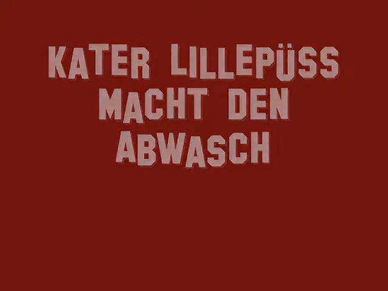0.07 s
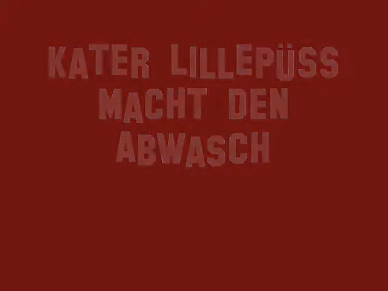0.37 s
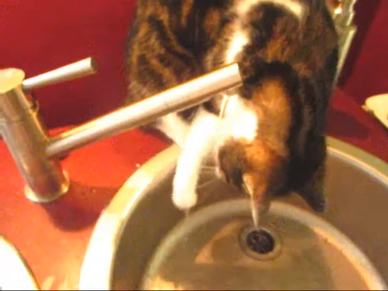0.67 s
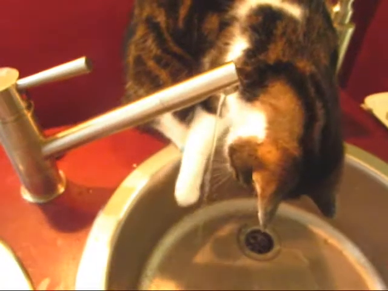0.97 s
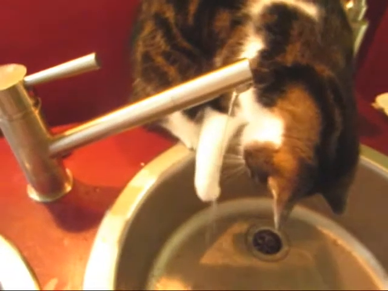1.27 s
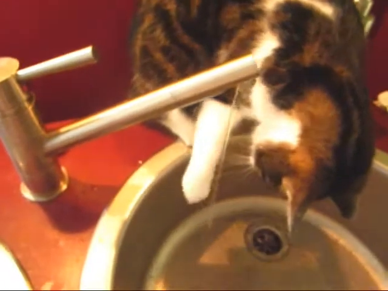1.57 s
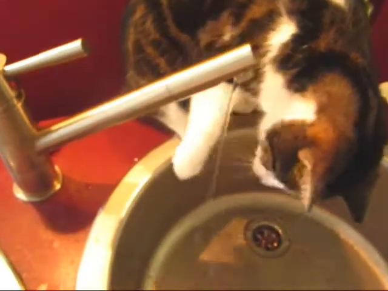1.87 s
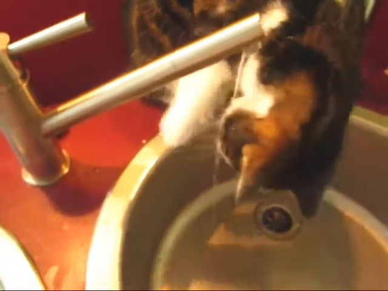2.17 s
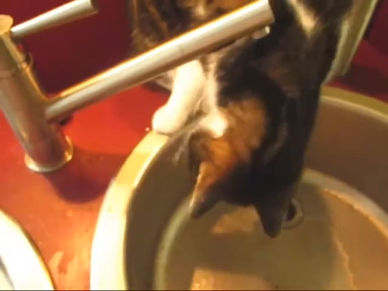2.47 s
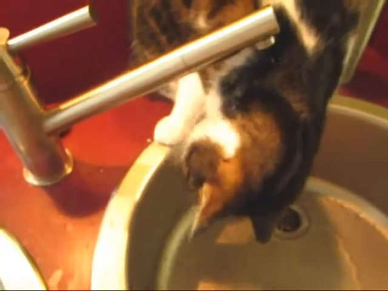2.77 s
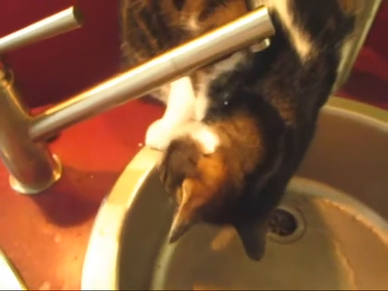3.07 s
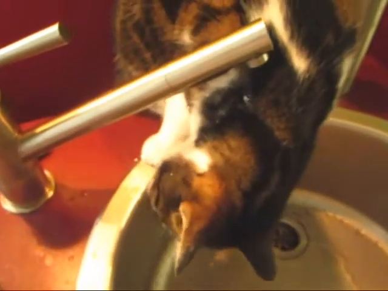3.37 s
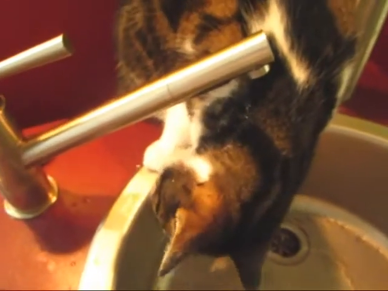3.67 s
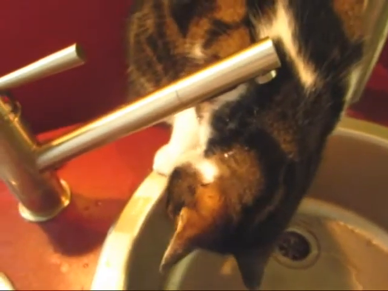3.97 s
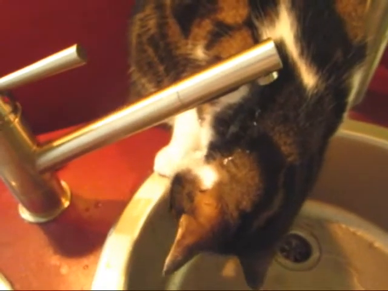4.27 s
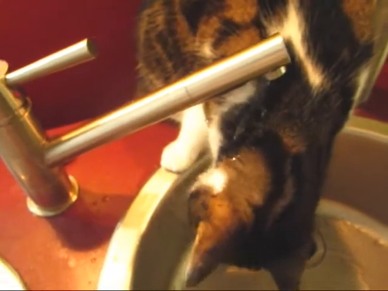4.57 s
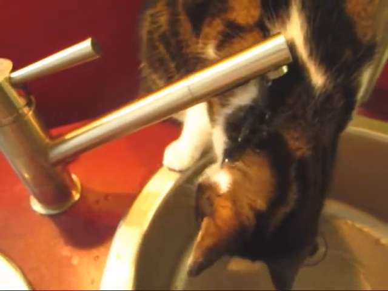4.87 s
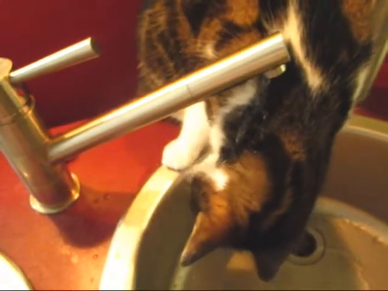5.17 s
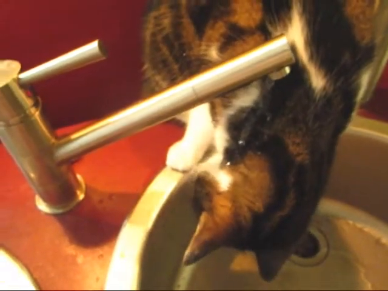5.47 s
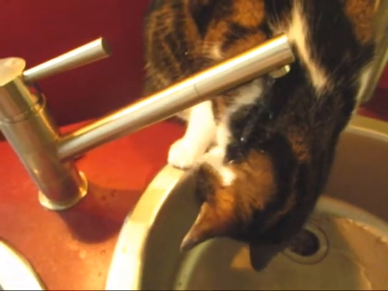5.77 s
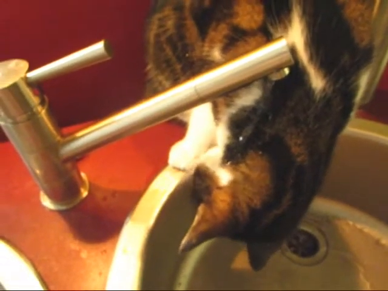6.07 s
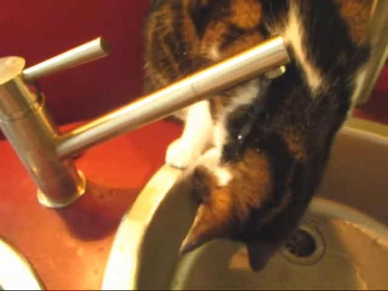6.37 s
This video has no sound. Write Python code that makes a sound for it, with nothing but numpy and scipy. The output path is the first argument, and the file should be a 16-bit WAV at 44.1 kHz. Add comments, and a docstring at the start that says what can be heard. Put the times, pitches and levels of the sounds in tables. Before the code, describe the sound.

Close to a steel kitchen sink, a thin stream of tap water patters and drums unevenly while a cat paws at it, flinging bigger drops that slap and plink. The drumming stops as the cat puts its head under the stream, leaving soft swishes of wet fur and a few faint plinks. Something clacks across the room, a distant machine hums briefly, and a small dry bump ends it, over faint hiss.

```python
"""Cat at the kitchen tap

A thin stream of tap water beads into drops that drum on a steel sink; a cat paws at it and flings
bigger drops. Then it puts its head under the stream: the drumming stops, leaving soft swishes of wet
fur and a few plinks. Something clacks in the room, a distant machine hums up and runs down, and a dry
bump comes at the end, all over a faint hiss and a thin electronic whine."""
import sys
import numpy as np
from scipy import signal
from scipy.fft import rfft, irfft, next_fast_len
from scipy.io import wavfile
from scipy.ndimage import uniform_filter1d, map_coordinates

SR = 44100
rng = np.random.default_rng(int(sys.argv[2]) if len(sys.argv) > 2 else 0)


def transcribe(signal):
    """Save signal, clipped to [-1, 1], as a 16-bit WAV file at the path in sys.argv[1]."""
    frames = np.atleast_2d(signal).T
    limited = np.clip(frames, -1, 1)
    pcm = np.round(limited * 32767).astype(np.int16)
    wavfile.write(sys.argv[1], SR, pcm)


N = 291501
TIME = np.arange(N) / SR
AGE = TIME[:SR // 2]  # seconds since a hit
START_S, TOP_HZ = 0.665, 15450  # the sound's entry; its treble limit
# EQ of water splatting on steel: f/Hz, level/dB
SPATTER_EQ = [(100, -60), (300, -19), (600, 3.5), (1300, 2.5), (1700, -0.5), (2400, 3.5), (3600, -5),
              (6000, -9), (9500, -8.5), (10400, -9), (11300, -8.5), (12000, -12), (12800, -8),
              (15000, -10.5)]


def amp(db):
    """Decibels to gain."""
    return 10 ** (np.asarray(db) / 20)


def unit(x):
    """Scale to rms 1."""
    return x / np.sqrt(np.mean(x ** 2) + 1e-20)


def unit_attack(x):
    """Scale a hit to rms 1 over its first 10 ms."""
    return x / np.sqrt(np.mean(x[:SR // 100] ** 2) + 1e-20)


def along(points, hz):
    """Read (f/Hz, value) points on a log frequency axis."""
    freqs, values = np.transpose(points)
    return np.interp(np.log(hz + 1), np.log(freqs), values)


def fade(t60):
    """A decay of 60 dB in t60 seconds."""
    return np.exp(-np.log(1000) * AGE / t60)


def add(track, s, sound):
    """Mix a sound into the track at s seconds."""
    part = track[round(s * SR):][:len(sound)]
    part += sound[:len(part)]


def colour(x, eq):
    """Minimum-phase EQ with a power gain of 1."""
    size = 2 * next_fast_len(len(x))
    gain = unit(amp(along(eq, np.fft.rfftfreq(size, 1 / SR))))
    cepstrum = irfft(np.log(gain + 1e-6))
    cepstrum[1:size // 2] *= 2
    cepstrum[size // 2 + 1:] = 0
    return irfft(rfft(x, size) * np.exp(rfft(cepstrum)), size)[:len(x)]


def stream(drops_per_s=85, size_spread_db=2, drum_db=-1.43, spray=0.35):
    """The stream beads into uneven drops; each drums the steel and spatters, both following the flow."""
    # water that gets past the paw to the basin floor: t/s, level/dB
    flow = [(0.67, -36), (0.708, -34), (0.768, -47.5), (0.906, -31), (1.022, -41), (1.03, -33.5),
            (1.22, -33), (1.26, -39.5), (1.344, -31), (1.432, -32.5), (1.482, -25.5), (1.582, -31.5),
            (1.592, -41), (1.754, -37), (1.774, -31), (1.83, -40.5), (2.212, -32.5), (2.45, -48)]
    times, levels = np.transpose(flow)
    flow_db = np.interp(TIME, times, levels)
    usual_db = levels.mean()
    spatter_db = usual_db - 14 + 0.97 * (flow_db - usual_db)  # rides under the drumming
    drum, splats = np.zeros(N), np.zeros(N)
    slots = np.arange(START_S, times[-1], 1 / drops_per_s)
    for s in slots + rng.uniform(0, 1 / drops_per_s, len(slots)):
        size = amp(size_spread_db * np.clip(rng.standard_normal(), -2, 1.5))
        add(drum, s, size * steel(scatter_db=2, contact_hz=2500))
        add(splats, s, size * fade(0.031) * rng.standard_normal(len(AGE)))
    running = (TIME > START_S) & (TIME < times[-1])
    mist = spray * running * rng.standard_normal(N)
    spatter = colour(splats / splats[running].std() + mist, SPATTER_EQ)
    return amp(flow_db + drum_db) * drum / drum[running].std() + amp(spatter_db) * spatter


def steel(scatter_db, contact_hz, attack_s=0.0022):
    """The basin rings: each impact point weights the modes anew; soft contact favours the low ones."""
    # modes of the steel basin: f/Hz, bandwidth/Hz, level/dB
    modes = [(141.2, 9.7, -10.5), (211.3, 7.8, -5), (293, 13, 2.5), (338.5, 8.8, -4), (384.7, 12.5, 1.5),
             (484, 22, -9), (508, 39, -5), (543.3, 13, -8), (670, 40, -1), (742, 24, -3), (792, 20, -5),
             (995, 26, -13), (1166, 23, -13.5), (1317, 59, -9)]
    hz, width, db = np.transpose(modes)[:, :, None]
    reach = 1 / (1 + (hz / contact_hz) ** 5)
    strength = amp(db + scatter_db * rng.standard_normal(hz.shape))
    weight = reach * strength * np.sqrt(width) * rng.choice([-1, 1], hz.shape)
    t = AGE[:SR // 3]
    ring = np.sum(weight * np.exp(-np.pi * width * t) * np.sin(2 * np.pi * hz * t), axis=0)
    return (1 - np.exp(-t / attack_s)) * ring * np.sqrt(2) / np.linalg.norm(weight)


def bowl(x, echo, span_s, tail):
    """The direct sound, a short volley of reflections across the bowl, then a weak tail."""
    walls = rng.standard_normal(len(AGE)) * (np.exp(-(AGE / span_s) ** 4) + tail * fade(0.2))
    walls *= echo / np.linalg.norm(walls)
    walls[0] += 1
    return signal.fftconvolve(x, walls)[:len(x)]


def heavy_drops(splat_trim_db=-8, drum_trim_db=-3):
    """Heavy drops slap the steel and set it ringing."""
    # single flung drops: t/s, splat level/dB, drum level/dB
    landings = [(.668, -35, -38), (0.7391, -25.5, -50), (0.889, -18, -50), (0.947, -30, -29.5),
                (1.145, -35, -30), (1.183, -36, -28.5), (1.345, -33, -26), (1.401, -29.5, -36),
                (1.4608, -19.5, -24), (1.481, -23.5, -19), (1.515, -24, -24), (1.767, -32.5, -26.5),
                (1.932, -27, -31), (1.975, -32.5, -27.5), (2, -34, -33), (2.026, -29.5, -30),
                (2.061, -30, -29), (2.095, -32, -39), (2.143, -29.5, -33), (2.247, -33, -28)]
    out = np.zeros(N)
    for s, splat_db, drum_db in landings:
        slap = bowl(fade(0.00019), echo=3.2, span_s=0.0097, tail=0.21)
        add(out, s, amp(splat_db + splat_trim_db) * unit_attack(colour(slap, SPATTER_EQ)))
        add(out, s, amp(drum_db + drum_trim_db) * steel(scatter_db=0, contact_hz=1210))
    return out


def plinks(trim_db=-10, overtone_db=-15, tilt_db_per_octave=-5.5):
    """A drop's sharp tick, two quickly damped rings and a faint overtone, drawn out by the bowl."""
    # plinking drops: t/s, level/dB, lower ring f/Hz, upper ring f/Hz, relative tick level/dB
    landings = [(0.6941, -25.5, 4300, 7700, -20), (0.961, -20, 4500, 7460, -22),
                (1.582, -21.5, 4340, 7700, 2), (1.8255, -29.5, 2970, 9150, -14),
                (1.877, -35.5, 5770, 6150, -1), (1.991, -33, 4160, 6900, 2), (2.003, -27, 3770, 8200, -6),
                (2.247, -34.5, 3100, 9000, -14), (2.3458, -19.5, 2780, 4300, -9),
                (2.349, -29, 9100, 14800, -4), (2.63, -34, 4060, 8000, -14),
                (4.562, -31.5, 2400, 9400, -20), (4.576, -32.5, 1800, 2940, -5),
                (4.996, -36, 1540, 1900, -18), (5.06, -41, 5000, 7000, -16), (6.295, -38, 5200, 6500, -16)]
    # EQ of the impact tick: f/Hz, level/dB
    tick_eq = [(500, -17), (2500, -9.5), (4500, -7), (5700, 8), (7000, -1.5), (9000, -13), (11500, -12),
               (15000, -9)]
    out = np.zeros(N)
    for s, db, low_hz, high_hz, tick_db in landings:
        high_db = tilt_db_per_octave * np.log2(high_hz / low_hz)
        overtone_hz = min(2.68 * low_hz, TOP_HZ)
        rings = 0
        for hz, ring_db in (low_hz, 0), (high_hz, high_db), (overtone_hz, overtone_db):
            ping = np.sin(2 * np.pi * hz * AGE) * fade(0.0055)
            rings += amp(ring_db) * unit_attack(bowl(ping, echo=1.94, span_s=0.012, tail=0.51))
        snap = rng.standard_normal(len(AGE)) * fade(0.0016)
        tick = unit_attack(colour(bowl(snap, echo=0.46, span_s=0.0069, tail=0.28), tick_eq))
        add(out, s, amp(db + trim_db) * (rings + amp(tick_db) * tick))
    return out


def bubbles(trim_db=-13.5, rise=0.5, attack_s=0.002):
    """Trapped bubbles ring, rising slightly in pitch."""
    # air bubbles in the drain: t/s, level/dB, f/Hz, t60/s
    blips = [(1.243, -23.5, 1120, 0.014), (1.248, -15.5, 1070, 0.035), (1.249, -36, 10950, 0.029),
             (1.25, -37, 13100, .025)]
    out = np.zeros(N)
    for s, db, hz, t60 in blips:
        chirp = np.sin(2 * np.pi * hz * (AGE + rise * AGE ** 2))
        envelope = fade(t60) * (1 - np.exp(-AGE / attack_s))
        add(out, s, amp(db + trim_db) * unit_attack(chirp * envelope))
    return out


def low_thuds(trim_db=-2):
    """Soft, low thuds of the steel basin, mostly as big drops land."""
    # thuds on the basin: t/s, level/dB
    thuds = [(0.698, -23), (1.824, -28), (1.878, -25), (1.934, -24.5), (1.974, -29.5), (2.341, -31),
             (6.329, -38)]
    out = np.zeros(N)
    for s, db in thuds:
        add(out, s, amp(db + trim_db) * steel(scatter_db=4.5, contact_hz=130))
    return out


def wet_fur(attack_s=0.048, release_s=0.1, fizz_trim_db=-1, fizz_db_per_s=-30, grain_db=0.5):
    """Wet hairs slip past each other in strokes that rise, hold and die; fine spray on them fizzes."""
    # strokes of fur against rim and stream: t/s, hold/s, level/dB, relative fizz level/dB
    swishes = [(2.726, 0.048, -43.5, -1.5), (2.926, .15, -39.5, -3.5), (3.228, 0.17, -46.5, -1.5),
               (4.708, .04, -47.5, 2), (5.71, 0.016, -47.5, 3.5), (5.811, 0.048, -43, 3)]
    # EQ of rubbing fur: f/Hz, level/dB
    rub_eq = [(100, -8), (300, -1), (700, -2), (1300, 0), (1650, -3.5), (2000, 1), (2500, -7), (3000, -9),
              (4500, -22.5), (9000, -23.5), (15000, -16.5)]
    # EQ of the fine spray: f/Hz, level/dB
    fizz_eq = [(1000, -31), (2800, 3.5), (4500, 1.5), (7000, -4.5), (9500, -5), (11800, -16), (14000, -21),
               (15500, -13)]
    rub_power = amp(-54.5) ** 2 * (TIME > 2)  # from here on the stream runs softly into the fur
    fizz_power = amp(-5) ** 2 * rub_power
    for s, hold, db, spray_db in swishes:
        age = np.maximum(TIME - s, 0)
        dying = np.maximum(age - attack_s - hold, 0)
        stroke = amp(db) * np.minimum(age / attack_s, 1) * np.exp(-dying / release_s)
        rub_power += stroke ** 2
        fizz_power += (stroke * amp(spray_db + fizz_db_per_s * age)) ** 2  # sheds its spray, then dulls
    grains = amp(grain_db * unit(uniform_filter1d(rng.standard_normal(N), size=90)))
    rub = unit(colour(grains * rng.standard_normal(N), rub_eq))
    fizz = unit(colour(grains * rng.standard_normal(N), fizz_eq))
    return np.sqrt(rub_power) * rub + amp(fizz_trim_db) * np.sqrt(fizz_power) * fizz


def clack(s=3.708, db=-27):
    """A hard clack across the kitchen: a crack, the near walls' answer, then the room's tail."""
    # EQ of the clack: f/Hz, level/dB
    clack_eq = [(100, -11), (350, -2), (800, 4.5), (1700, 2.5), (2700, -4), (4500, -14.5), (9000, -18),
                (15000, -14.5)]
    crack, walls, tail = amp(10) * fade(0.0061), fade(0.21), amp(-10) * fade(1.0)
    burst = np.sqrt(crack ** 2 + walls ** 2 + tail ** 2) * rng.standard_normal(len(AGE))
    out = np.zeros(N)
    add(out, s, amp(db) * unit_attack(colour(burst, clack_eq)))
    return out


def bump(s=6.527, db=-34.5):
    """A finger taps a casing close by: short and dry."""
    # EQ of the dull tap: f/Hz, level/dB
    bump_eq = [(50, -11), (150, 2), (280, 7.5), (550, -20), (1000, -7), (2300, -11), (3200, -25),
               (8000, -28), (15000, -22)]
    knock = bowl(-fade(0.0001), echo=0.5, span_s=0.0075, tail=0.022)
    out = np.zeros(N)
    add(out, s, amp(db) * unit_attack(colour(knock, bump_eq)))
    return out


def kitchen_reverb(x):
    """The room's tail, longest in the mids and dying faster in the bass and treble."""
    # decay of the kitchen: f/Hz, t60/s
    decay_times = [(200, 0.25), (1500, 0.58), (5000, 0.46), (14000, 0.36)]
    hz, t, spectrum = signal.stft(rng.standard_normal(SR // 2), SR, nperseg=256)
    decay = amp(-60 * t / along(decay_times, hz)[:, None])
    _, tail = signal.istft(spectrum * decay, SR, nperseg=256)
    return signal.fftconvolve(x, tail / np.linalg.norm(tail))[:N]


def machine_hum(full_s=4.74, off_s=5.4, full_hz=80, full_db=-47.5, run_down_s=0.37, waver=0.1):
    """A distant machine swells up to speed, holds, then is switched off, sinks in pitch and fades."""
    until_full = np.maximum(full_s - TIME, 0)
    since_off = np.maximum(TIME - off_s, 0)
    hz = (full_hz - 8 * until_full) * np.exp(-since_off / run_down_s)
    db = full_db - 22 * until_full - 30 * since_off
    drift = map_coordinates(rng.standard_normal(80), [TIME * 10])  # ten random points a second
    return np.sqrt(2) * amp(db) * (1 + waver * drift) * np.sin(2 * np.pi * np.cumsum(hz) / SR)


def hiss_and_whine(hiss_db=-45.5, whine_trim_db=-0.5):
    """A bed of steady hiss and the thin whine of electronics."""
    # EQ of the hiss: f/Hz, level/dB
    hiss_eq = [(20, -7.5), (62, 2), (95, -2), (140, 2.5), (260, -4.5), (500, -3.5), (1250, -7.5),
               (2200, -11), (3600, -14), (6500, -15.5), (10000, -22.5), (11900, -26.5), (13700, -23),
               (15500, -30.5)]
    # tones of the whine: f/Hz, level/dB
    tones = [(4118, -62), (4150, -63), (5706, -61), (6293, -62.5), (7854, -70), (7881, -69), (13808, -78),
             (14395, -77)]
    hiss = amp(hiss_db) * unit(colour(rng.standard_normal(N), hiss_eq))
    whine = sum(amp(db) * np.sin(2 * np.pi * (hz * TIME + rng.random())) for hz, db in tones)
    return hiss + np.sqrt(2) * amp(whine_trim_db) * whine


def scene():
    """The sink close by, the kitchen around it, in mono."""
    sink = stream() + heavy_drops() + plinks() + bubbles() + low_thuds()
    room = amp(-13) * kitchen_reverb(sink)
    return (sink + room + wet_fur() + clack() + bump() + machine_hum() + hiss_and_whine())[None]


def record(dry):
    """Silence, a 3 ms fade-in at START_S, and a steep high cut at TOP_HZ."""
    fade_in = np.clip((TIME - START_S) / 0.003, 0, 1)
    size = next_fast_len(N + SR // 2)
    high_cut = 1 / (1 + (np.fft.rfftfreq(size, 1 / SR) / TOP_HZ) ** 120)
    return irfft(rfft(dry * fade_in, size) * high_cut, size)[..., :N]


dry = scene()
out = record(dry)
transcribe(out)
```